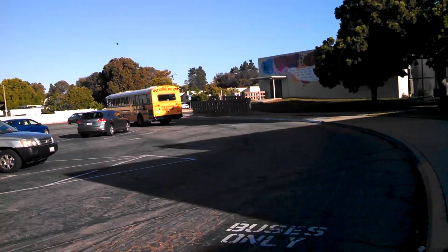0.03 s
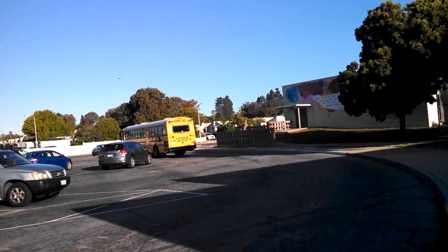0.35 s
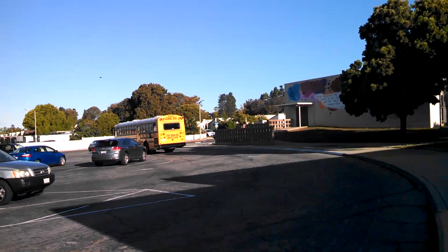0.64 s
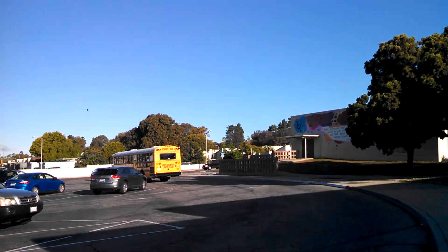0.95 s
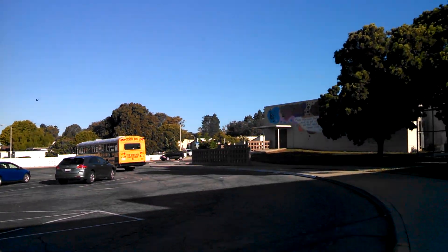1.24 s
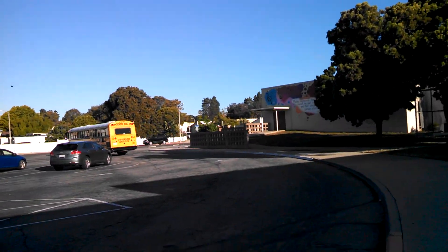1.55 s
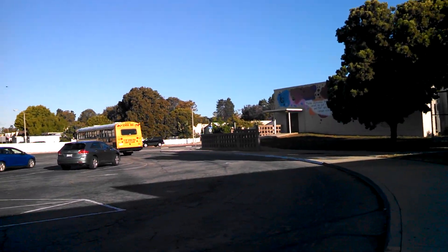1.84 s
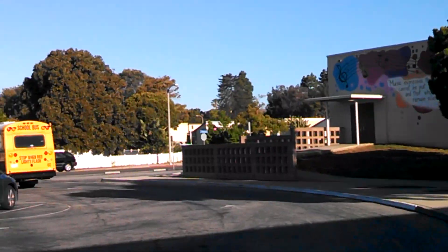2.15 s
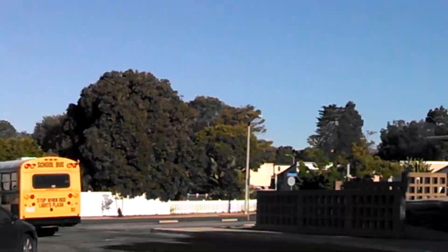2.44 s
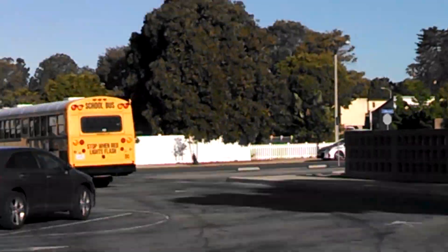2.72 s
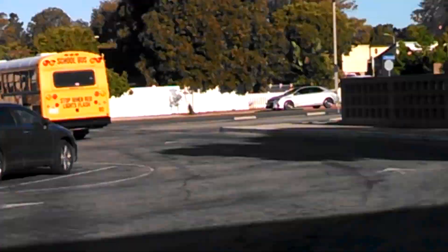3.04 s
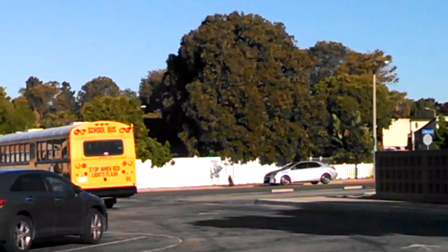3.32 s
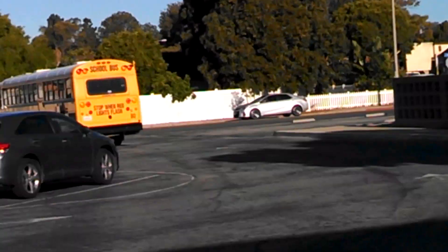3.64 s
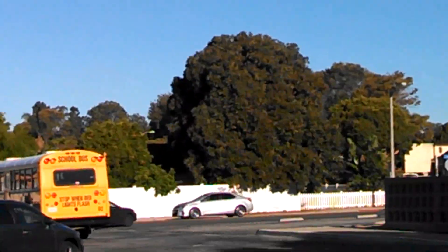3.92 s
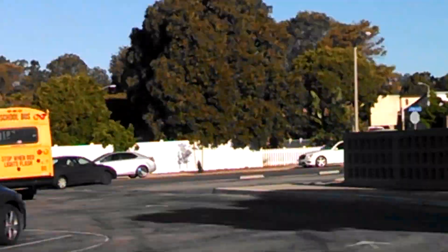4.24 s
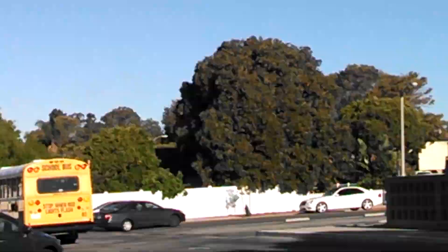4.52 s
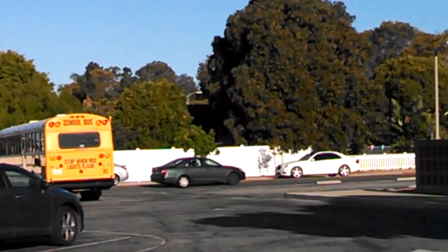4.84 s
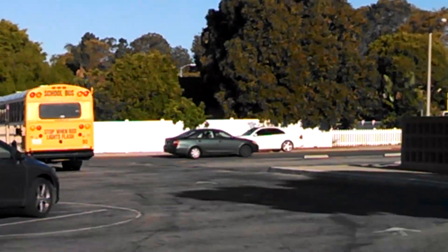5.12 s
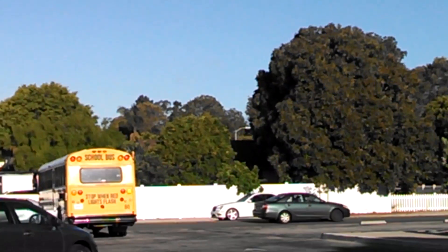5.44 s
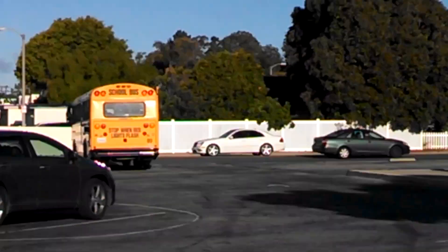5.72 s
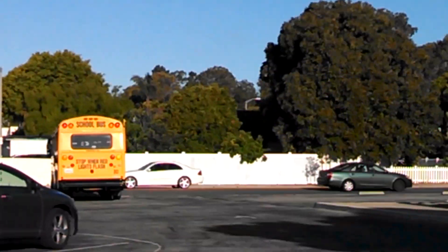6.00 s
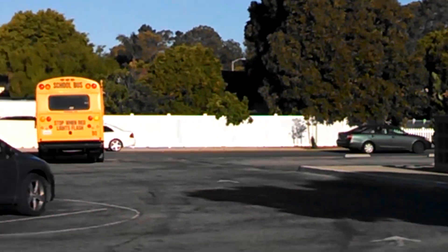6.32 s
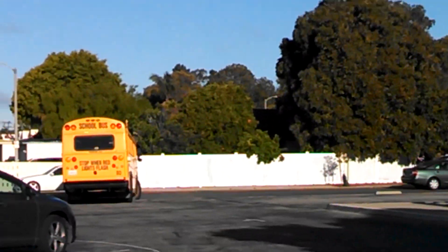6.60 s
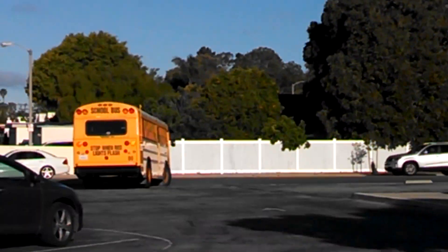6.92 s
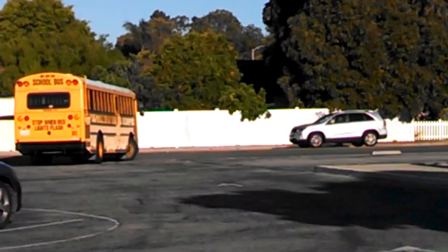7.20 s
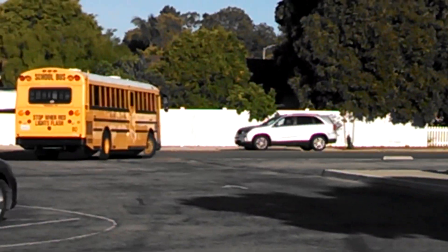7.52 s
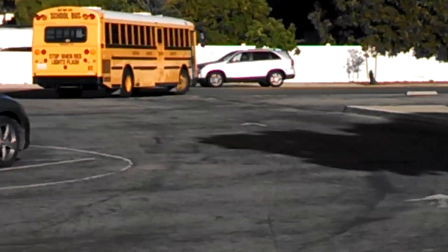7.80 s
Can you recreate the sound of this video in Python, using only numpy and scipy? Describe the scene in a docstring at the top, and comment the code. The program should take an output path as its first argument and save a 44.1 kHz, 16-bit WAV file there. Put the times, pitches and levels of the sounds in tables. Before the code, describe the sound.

Wind gusts and camera knocks over a school bus engine rumbling across a car park and accelerating, with faint high birdsong.

```python
"""A car park: some forty metres off, a diesel school bus pulls away. Its roar pulses with the firings,
its tailpipe booms, and near the end it accelerates and the turbo whistles. Under it lie traffic and a
steady hum; small birds whistle overhead. Gusts buffet and pop on a hand-held camera that clicks and knocks.
Its stereo comes from two ports, each delayed and subtracted from the other; hard thumps duck the gain."""
import sys
import numpy as np
from scipy import signal
from scipy.fft import rfft, irfft
from scipy.io import wavfile
from scipy.ndimage import uniform_filter1d, minimum_filter1d

SR = 44100
rng = np.random.default_rng(int(sys.argv[2]) if len(sys.argv) > 2 else 0)


def put_to_file(sound):
    """Save the sound as 16-bit audio at rate SR, in the file named by the first command-line argument."""
    columns = np.atleast_2d(sound).T  # one column per channel
    safe = np.clip(columns, -1, 1)
    whole_steps = np.round(safe * 32767)
    wavfile.write(sys.argv[1], SR, whole_steps.astype(np.int16))


N = 346626
TIME = np.arange(N) / SR
FREQ = np.maximum(np.arange(N // 2 + 1) * SR / N, 1)
PORT_LAG = 16  # samples that sound takes from port to port


def undb(db):
    """Decibels to gain."""
    return 10 ** (np.asarray(db) / 20)

def unit(x):
    """Scale to rms 1."""
    return x / np.sqrt(np.mean(x ** 2))

def curves(table):
    """Automation lanes: each column of a timed table, joined by straight lines."""
    times, *columns = np.transpose(table)
    return [np.interp(TIME, times, column) for column in columns]

def swell(start, length, attack, release):
    """Envelope: rise, hold until the length is over, then die away."""
    since = TIME - start
    return np.clip(since / attack, 0, 1) * np.exp(-np.maximum(since - length, 0) / release)

def walk(rate):
    """Random drift: levels held 1 / rate s and slewed twice; rms 1."""
    hold = int(SR / rate)
    steps = np.repeat(rng.standard_normal(N // hold + 1), hold)
    return unit(uniform_filter1d(uniform_filter1d(steps, hold), hold)[:N])

def sine(hz):
    """Oscillator that follows a pitch curve."""
    return np.sin(2 * np.pi * np.cumsum(hz) / SR)

def eq(x, points):
    """Filter by a curve of (f/Hz, gain/dB) points."""
    hz, db = np.transpose(points)
    return irfft(rfft(x) * undb(np.interp(np.log(FREQ), np.log(hz), db)), N)

def colour(x, points):
    """EQ, then scale to rms 1."""
    return unit(eq(x, points))

def band(x, hz, octaves):
    """Gentle causal band-pass."""
    edges = np.clip([hz / 2 ** (octaves / 2), hz * 2 ** (octaves / 2)], 10, SR / 2 - 500)
    return signal.sosfilt(signal.butter(2, edges, "band", fs=SR, output="sos"), x)

def band_noise(hz, octaves, samples=N):
    """A separate band of noise for each port; rms 1."""
    return unit(band(rng.standard_normal((2, samples)), hz, octaves))

def arrive(x, lag):
    """A wave from one side reaches the left port lag samples after the right one."""
    return np.array([irfft(rfft(x) * np.exp(-2j * np.pi * FREQ * lag / SR), N), x])

def diffuse_noise():
    """Noise from all sides: the ports agree only on waves longer than their spacing."""
    alike = np.sinc(2 * FREQ * PORT_LAG / SR)
    common, apart = irfft(rfft(rng.standard_normal((2, N))) * np.sqrt([1 + alike, 1 - alike]), N)
    return np.array([common + apart, common - apart]) / np.sqrt(2)

def echoed(song, echo_db, decay_s=.055):
    """A bird's call and its short, diffuse echo from trees and walls."""
    tail = rng.standard_normal((2, SR)) * np.exp(-TIME[:SR] / decay_s)
    echo = signal.fftconvolve(song[None], tail / np.sqrt(np.sum(tail[0] ** 2)), axes=1)[:, :N]
    return song + undb(echo_db) * echo


def hiss(db=-68, hz=12500):
    """A faint high hiss that flickers a little."""
    return undb(db + walk(21.8)) * band_noise(hz, 1)

# Tone of the traffic bed: f/Hz, relative level/dB
TRAFFIC_EQ = [(25, -24), (40, -32), (60, -1.5), (100, 3), (170, 4), (350, -2), (800, -5), (1200, -11.5),
              (2100, -13), (3000, -26.5), (5000, -35), (7500, -43), (15000, -44.5)]
def traffic(trim_db=-3, drift_db=1.07):
    """A wash of traffic and echoes from all sides."""
    return colour(diffuse_noise(), TRAFFIC_EQ) * undb(trim_db + drift_db * walk(20.79))

# Hum partials, one just flat of the third harmonic: multiple, relative level/dB
HUM_PARTIALS = [(1, 0.5), (2, -14.5), (2.94, -21), (5, -30)]
def hum(hz=120.4, start_db=-35, rise_db_per_s=1, waver_db=3):
    """A steady hum that slowly comes forward, each partial wavering by itself."""
    cycles = np.cumsum(hz * (1 + .0081 * walk(13))) / SR
    tone = sum(undb(db + waver_db * walk(11)) * np.sin(2 * np.pi * k * cycles) for k, db in HUM_PARTIALS)
    return arrive(tone, lag=6.2) * undb(start_db + rise_db_per_s * TIME)

def trill(start=.313, per_s=16, count=7, chip_s=.042, hz=10000, db=-64, uneven_db=2.5):
    """A small, distant bird ticks out a quick, uneven run of high, rasping chips."""
    beats = (TIME - start) * per_s + .061 * walk(12)
    progress = np.clip(beats % 1 / (per_s * chip_s), 0, 1)
    chips = np.sin(np.pi * progress) * band_noise(hz, .13) * (beats > 0) * (beats < count)
    return undb(db + uneven_db * walk(61)) * chips

# Falling bird notes: t/s, starting f/Hz, level/dB
CHIRP_NOTES = [(2.047, 4250, -60), (2.957, 3680, -52.5), (3.161, 3920, -54)]
def chirps(length_s=.0517, fall=.142, waver=.014, rough_db=2.5):
    """Another bird: short, slightly husky notes that drop ever faster."""
    song, shake = np.zeros(N), waver * walk(900)
    progress = np.linspace(0, 1, int(length_s * SR))
    for start, start_hz, db in CHIRP_NOTES:
        note = int(start * SR) + np.arange(len(progress))
        hz = start_hz * (1 - fall * progress ** 2 + shake[note])
        song[note] += undb(db) * np.sin(np.pi * progress) * sine(hz)
    return echoed(song * undb(rough_db * walk(150)), echo_db=-8)

# Birdsong overhead: t/s, length/s, starting f/Hz, glide/share of pitch, relative level/dB
WHISTLE_NOTES = [(1.23, 0.1, 7450, 0.016, -57), (1.552, 0.07, 7470, 0.0028, -52),
                 (1.64, 0.086, 7530, -0.003, -46), (1.72, 0.03, 8700, -.004, -56),
                 (1.73, 0.14, 9260, 0.0052, -56), (1.804, 0.053, 8650, .002, -48),
                 (1.874, 0.15, 8700, 0.0079, -56), (1.979, 0.092, 7500, -0.0034, -49),
                 (3.69, 0.26, 7530, 0.038, -53), (3.716, 0.066, 8740, 0.0021, -59),
                 (3.766, 0.34, 9470, -0.003, -56.5), (3.96, .045, 8400, 0.004, -53),
                 (4.1, 0.18, 8990, 0.0033, -50), (4.262, 0.22, 7590, -0.025, -55),
                 (4.269, 0.21, 9020, -0.042, -55)]
def bird_whistles(waver=.0058, trim_db=-2.5, ragged_db=4.5):
    """Thin, buzzy whistles that break up as they go."""
    song, shake = np.zeros(N), waver * walk(450)
    for start, length, start_hz, glide, db in WHISTLE_NOTES:
        progress = np.linspace(0, 1, int(length * SR))
        note = int(start * SR) + np.arange(len(progress))
        hz = start_hz * (1 + glide * progress) * (1 + shake[note])
        song[note] += undb(db) * np.sqrt(4 * progress * (1 - progress)) * sine(hz)
    return echoed(song * undb(trim_db + ragged_db * walk(90)), echo_db=0)

# Fader ride of the light air between gusts: t/s, relative level/dB
BREEZE_RIDE = [(0, -30.5), (1.9, -26), (2.4, -31), (3.3, -32), (3.9, -34), (4.25, -39), (4.6, -30.5),
               (5.7, -31), (6.4, -37.5), (7.1, -35), (7.55, -45), (7.86, -36)]
# Gust hits: t/s, length/s, relative level/dB, flutter against that level/dB
GUST_CUES = [(-.05, 0.46, -25.5, -15), (0.307, .14, -17.5, -8), (0.476, 0.12, -21, -17),
             (0.782, 0.14, -21, -8), (1.041, 0.13, -20, -11.5), (1.36, 0.2, -21.5, -21),
             (1.554, 0.057, -17.5, -21), (1.8, 0.051, -17, -15.5), (1.938, 0.13, -22, -12),
             (2.252, 0.15, -32, 0.5), (2.868, 0.06, -26.5, -3.5), (3.038, 0.16, -25, -21),
             (3.506, 0.077, -25.5, -22), (4.453, 0.08, -33, -5), (4.662, 0.26, -50, -21),
             (5.181, 0.06, -18, -15), (5.292, 0.053, -16.5, -7.5), (5.543, 0.017, -19, -11),
             (6.064, 0.04, -28, -27), (6.68, 0.068, -35, -12)]
# Tone of the wind rumble: f/Hz, relative level/dB
RUMBLE_EQ = [(20, -49), (32, -15), (50, -1), (75, 1.5), (120, -4), (200, -11), (300, -27), (600, -43),
             (2000, -67)]
def wind(gust_pitch_ratio=1.19, flutter_trim_db=-3, burst_db=4):
    """Eddies press on each port separately: deep in light air, higher and fluttering in gusts."""
    breeze_db, = curves(BREEZE_RIDE)
    push, flutter = 0, undb(breeze_db - 32)
    for start, length, db, flutter_db in GUST_CUES:
        gust = undb(db) * swell(start, length, attack=.019, release=.09)
        push = np.maximum(push, gust)
        flutter = np.maximum(flutter, gust * undb(flutter_db))
    gust_eq = [(hz * gust_pitch_ratio, db) for hz, db in RUMBLE_EQ]
    eddy_eq = [(100, -20), (153, 0), (397.8, -2), (700, -14), (1500, -32), (5000, -60), (15000, -80)]
    ports = []
    for port_db in (-2.3, 1):
        breeze = undb(breeze_db) * colour(rng.standard_normal(N) * undb(walk(11)), RUMBLE_EQ)
        rumble = push * colour(rng.standard_normal(N) * undb(walk(30)), gust_eq)
        eddies = flutter * colour(rng.standard_normal(N) * undb(burst_db * walk(120)), eddy_eq)
        ports.append(undb(port_db) * (breeze + rumble + undb(flutter_trim_db) * eddies))
    return np.array(ports)

# Dull thumps: t/s, relative level/dB, ring f/Hz, decay/s
THUMP_HITS = [(0.137, -13, 434, 0.0011), (0.241, -17.5, 277, 0.0027), (.268, -11.5, 360, 0.0011),
              (0.278, -5, 312, 0.0015), (0.3327, -6.5, 200, 0.0013), (0.367, -8.5, 347, 0.0019),
              (0.382, -13, 334, 0.0026), (.403, -7, 152, 0.0018), (0.419, -9, 345, 0.0022),
              (.483, -11.5, 220, 0.0015), (.526, -16, 280, 0.003), (.566, -10.5, 260, 0.0025),
              (1.612, -2, 265, 0.0007), (1.847, -6, 170, 0.0024), (1.9597, -7.5, 710, 0.00016),
              (2.311, 2.5, 335, 0.0011), (2.694, 3, 327, 0.0012), (2.699, -9, 446, .001),
              (4.008, 1.5, 242, 0.0011), (5.239, -3.5, 140, 0.0028), (5.609, -7, 121, 0.0034),
              (7.141, -9.5, 301.6, 0.00097)]
def thumps(trim_db=-.86):
    """Wind pops on the microphone and knocks of the camera: heavily damped pulses on the left port."""
    out, t = np.zeros((2, N)), TIME[:SR // 10]
    for start, db, hz, decay in THUMP_HITS:
        i = int(start * SR)
        envelope = t / decay * np.exp(1 - t / decay)
        out[0, i:i + len(t)] -= undb(db + trim_db) * envelope * np.sin(2 * np.pi * hz * t)
    return out

# Clicks of the case: t/s, relative level/dB, centre f/Hz, decay/s, tick level/dB
CLICK_HITS = [(0.136, -35.5, 1260, 0.0043, -64), (0.456, -36, 1560, 0.015, -60),
              (1.0095, -40, 3830, 0.0021, -27.5), (1.959, -32, 1400, 0.0088, -55),
              (2.07, -32, 1470, 0.0034, -62), (2.313, -17.5, 876, 0.0017, -52),
              (2.4362, -29.5, 1475, 0.0018, -55), (2.696, -20, 950, 0.0027, -50),
              (2.7, -36, 4530, 0.012, -35.5), (2.722, -43, 4620, 0.01, -42),
              (2.8445, -23.5, 1400, 0.0017, -39), (2.852, -39.5, 3320, 0.0064, -48),
              (2.923, -21, 1500, 0.0013, -28), (2.999, -38.5, 4260, 0.0056, -35),
              (3.028, -47, 4730, 0.0041, -49), (3.05, -51, 4800, .003, -48), (3.129, -55, 5200, .003, -43),
              (3.174, -41, 5240, 0.0017, -43), (3.191, -53, 5240, 0.0036, -43),
              (3.213, -43, 5470, 0.0016, -45), (3.234, -48, 4700, 0.0027, -50),
              (3.25, -49, 5000, 0.0015, -47), (3.272, -51, 5200, 0.0021, -48), (3.29, -51, 5500, .003, -43),
              (3.303, -49, 6000, .003, -44), (3.359, -50, 5100, .004, -46),
              (3.4357, -25, 1290, 0.00085, -45), (3.939, -44, 3000, 0.0056, -67),
              (4.986, -38, 2940, 0.0033, -58), (7.228, -41, 3260, 0.0067, -62)]
def clicks(trim_db=-2, snap=.68, tick_hz=12500):
    """The case clicks in the hand: a sharp contact, a short scrape and a bright tick."""
    out, t = np.zeros((2, N)), TIME[:SR // 10]
    for start, db, hz, decay, tick_db in CLICK_HITS:
        i = int(start * SR)
        contact = band(1. * (t == 0), hz, 1.2)
        contact *= snap / np.abs(contact).max()
        scrape = np.exp(-t / decay) * band_noise(hz, .79, len(t))
        tick = np.exp(-t / (.27 * decay)) * band_noise(tick_hz, .95, len(t))
        out[:, i:i + len(t)] += undb(db + trim_db) * (contact + scrape) + undb(tick_db) * tick
    return out

def case_ping(start=1.0095, hz=3940, decay_s=.0025, db=-38):
    """One tick makes a small part of the case ring."""
    since = np.maximum(TIME - start, 0)
    return undb(db) * np.exp(-since / decay_s) * np.sin(2 * np.pi * hz * since)

def zoom_rattle(db=-54, grains_per_s=170, decay_s=.0033):
    """A short, fine rattle of the camera's zoom motor, made of tiny grains of noise."""
    ticks = (rng.random(N) < grains_per_s / SR) * rng.uniform(.14, 1, N)
    grains = signal.lfilter([1], [1, -np.exp(-1 / (decay_s * SR))], ticks) * rng.standard_normal((2, N))
    rustle = colour(grains, [(1500, -44), (4500, 2), (6000, -3), (9000, -15), (13000, 1), (15500, 2)])
    fader = np.interp(TIME, [2.97, 3.01, 3.09, 3.15, 3.3, 3.39], [.05, .55, .25, 1, 1, 0])
    return undb(db) * rustle * fader

def air_valve(start=7.81, attack_s=.0022):
    """At the very end a valve on the bus starts to let off air, in two bands of hiss."""
    air = diffuse_noise()
    body = undb(-51) * unit(band(air, hz=3800, octaves=.67))
    sizzle = undb(-56) * unit(band(air, hz=13000, octaves=.5))
    return np.clip((TIME - start) / attack_s, 0, 1) * (body + sizzle)

# Bus moans: peak t/s, half length/s, f/Hz, glide/(Hz per s), hoarseness/share of pitch, level/dB
MOAN_CUES = [(4.53, .11, 576, 0.5, 0.039, -37.5), (6.42, 0.17, 748, 19, 0.0054, -42),
             (6.689, 0.13, 526, 60.5, 0.0037, -38.5)]
def moans():
    """Brief moans from the turning bus, hoarse or nearly pure."""
    out = 0
    for peak, half_length, hz, glide, hoarse, db in MOAN_CUES:
        since = TIME - peak
        pitch = (hz + glide * since) * (1 + hoarse * walk(200))
        out += undb(db) * np.exp(-(since / half_length) ** 2) * sine(pitch)
    return arrive(out, lag=4.5)

# Turbo sweep: t/s, f/Hz, level/dB
TURBO_SWEEP = [(6.0, 3690, -99), (6.15, 4090, -62), (6.3, 4900, -63), (6.5, 6000, -70), (6.65, 6430, -67.5),
               (6.9, 6150, -68), (7.1, 5750, -75.5), (7.3, 5390, -82)]
def turbo(breathiness=.025, patchy_db=4):
    """The turbo's breathy whistle rises and falls with the load."""
    hz, db = curves(TURBO_SWEEP)
    whistle = sine(hz * (1 + breathiness * walk(1100)))
    gate = (TIME > TURBO_SWEEP[0][0]) * (TIME < TURBO_SWEEP[-1][0])
    return arrive(whistle * undb(db + patchy_db * walk(25)) * gate, lag=7.6)

# Engine pulls: t/s, length/s, relative level/dB, overtone boost/dB, length of that growl/s
ENGINE_PULLS = [(4.288, .75, -35.5, 8, .3), (5.964, 1.44, -27, 11, 0.58)]
# Exhaust harmonics: multiple of the firing rate, relative level/dB
EXHAUST_PARTIALS = [(1, 8.5), (2, -12.5), (3, -14.5), (4, -26), (5, -39), (6, -35.5), (9, -37.5)]
def exhaust(firings, firing_hz, coast_db=-39, pipe_hz=54.7, pipe_width_hz=9.1, waver_db=.96):
    """The tailpipe's low note growls as the engine pulls and booms near the pipe's own pitch."""
    level, growl = undb(coast_db), 1
    for start, length, db, growl_db, growl_s in ENGINE_PULLS:
        level += undb(db) * swell(start, length, attack=.069, release=.04)
        growl *= undb(growl_db * swell(start, growl_s, attack=.069, release=.2))
    boom = undb(1) / np.sqrt(np.hypot(1, (firing_hz - pipe_hz) / pipe_width_hz))
    fundamental, *overtones = [
        level * undb(db + min(k, 2) * waver_db * walk(13)) * np.sin(2 * np.pi * k * firings)
        for k, db in EXHAUST_PARTIALS]
    # the boom comes from the left, the growl from near the centre
    return arrive(fundamental * boom, lag=-18) + arrive(sum(overtones) * growl, lag=1.3)

# Tone of the engine roar: f/Hz, relative level/dB
ROAR_EQ = [(40, -33), (110, -22.5), (200, 4), (350, 5), (600, -6.5), (900, -4.5), (1300, -15.5),
           (2000, -55.5), (3000, -58), (5000, -67.5), (15000, -60)]
def diesel_roar(firings, knock=.24, trim_db=-2):
    """Engine noise from the right that pulses with each firing."""
    pulsing = 1 + knock * np.cos(2 * np.pi * firings)
    roar = colour(rng.standard_normal(N) * pulsing, ROAR_EQ)
    return arrive(roar * undb(trim_db + walk(14)), lag=13.45)

# Fader ride of roar and traffic together: t/s, level/dB, treble boost/dB
DRONE_RIDE = [(0, -40, 8), (.7, -39.5, 7.5), (1.1, -34.5, 6), (1.6, -35.5, 6), (2.1, -38, 7),
              (2.55, -37.5, 8), (3.0, -37.5, 7), (3.8, -35, 3.5), (4.55, -33, 4.5), (5.1, -34, 5),
              (5.75, -36.5, 7), (6.02, -31.5, 8), (6.35, -32.5, 8.5), (7.0, -32, 5), (7.86, -32.5, 5)]
def drone(wash, treble_from_hz=2800, treble_to_hz=7500):
    """Roar and traffic swell; the highs come and go as the bus turns its engine bay to the listener."""
    db, treble_db = curves(DRONE_RIDE)
    highs = irfft(rfft(wash) / (1 + (treble_from_hz / FREQ) ** 4) / (1 + (FREQ / treble_to_hz) ** 4), N)
    return (wash + highs * (undb(treble_db) - 1)) * undb(db)

# Engine revs as the bus rolls, eases off and accelerates: t/s, firing f/Hz
ENGINE_REVS = [(4.0, 60.8), (4.5, 66.3), (5.0, 68.5), (5.7, 50.1), (5.9, 50.7), (6.02, 54.44),
               (6.17, 56.74), (6.5, 58.43), (6.72, 59.07), (6.93, 55.73), (7.13, 52.05), (7.4, 50.5),
               (7.86, 47.6)]
def scene():
    """Pressure at the two ports; one firing rate drives both roar and exhaust."""
    firing_hz, = curves(ENGINE_REVS)
    firings = np.cumsum(firing_hz * (1 + .00316 * walk(20))) / SR
    bed = drone(diesel_roar(firings) + traffic()) + hum()
    bus = exhaust(firings, firing_hz) + turbo() + moans() + air_valve()
    birds = bird_whistles() + chirps() + trill()
    close_up = wind() + thumps() + clicks() + case_ping() + zoom_rattle()
    return bed + bus + birds + close_up + hiss()

def gain_control(stereo, ceiling_db=-3, recover_db_per_s=9):
    """The gain ducks at each peak over the ceiling and creeps back."""
    overload = np.maximum(np.abs(stereo).max(axis=0) / undb(ceiling_db), 1)
    recovery = recover_db_per_s * TIME
    gain_db = np.minimum.accumulate(-20 * np.log10(overload) - recovery) + recovery
    return stereo * undb(uniform_filter1d(minimum_filter1d(gain_db, size=120), size=120))

# Right channel EQ, louder mostly in the bass: f/Hz, gain/dB
RIGHT_EQ = [(60, 2.5), (400, 2), (1500, 2), (2800, 1.8), (15000, -1.24)]
def record(dry, left_port_db=1, trim_db=-.2, low_cut_hz=30, high_cut_hz=15750):
    """Each channel is one port minus the other, delayed by their spacing; then EQ and ducking."""
    ports = dry * undb([[left_port_db], [0]])
    delayed = np.pad(ports[::-1], ((0, 0), (PORT_LAG, 0)), mode="edge")[:, :N]
    fade_in = np.minimum(np.arange(N) / (10 * PORT_LAG), 1)
    left, right = (ports - delayed) * undb(trim_db) * fade_in
    low_cut = signal.butter(2, low_cut_hz, "high", fs=SR, output="sos")
    high_cut = signal.ellip(10, .2, 70, high_cut_hz, fs=SR, output="sos")
    stereo = signal.sosfilt(low_cut, np.array([left, eq(right, RIGHT_EQ)]))
    return signal.sosfilt(high_cut, gain_control(stereo))


dry = scene()
out = record(dry)
put_to_file(out)
```